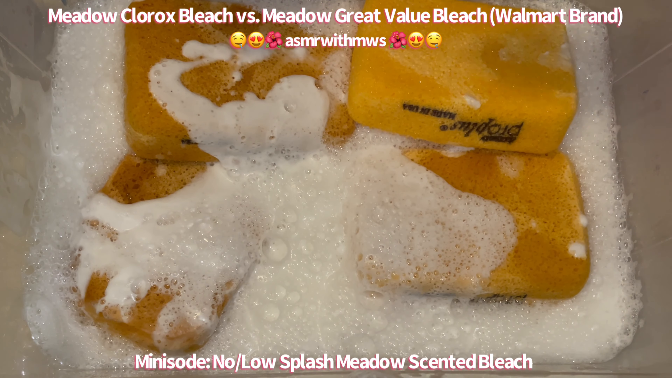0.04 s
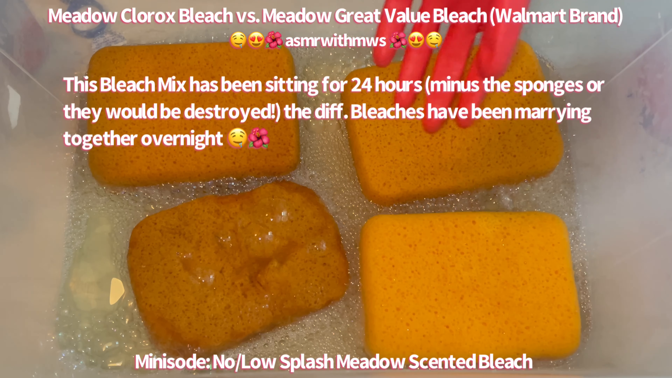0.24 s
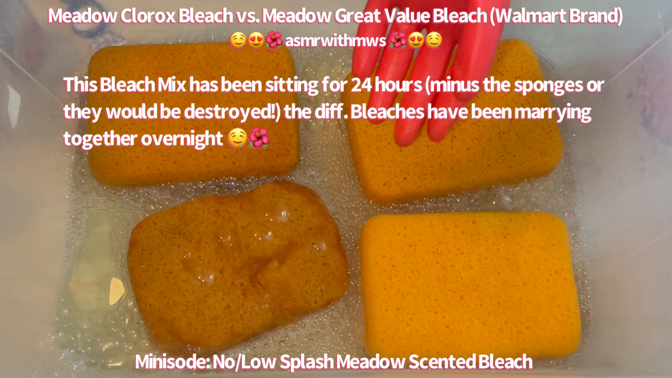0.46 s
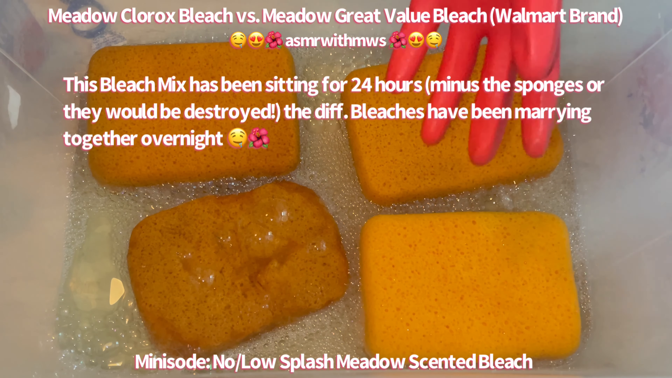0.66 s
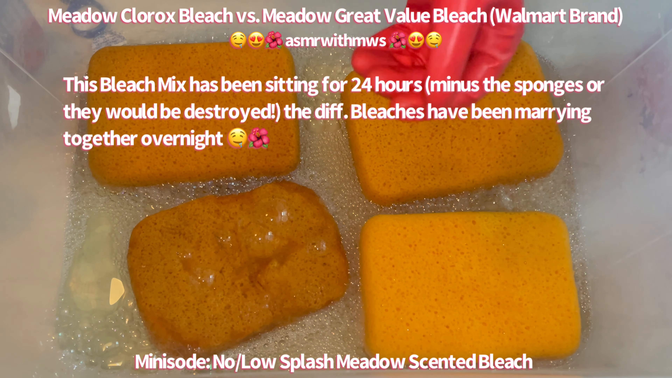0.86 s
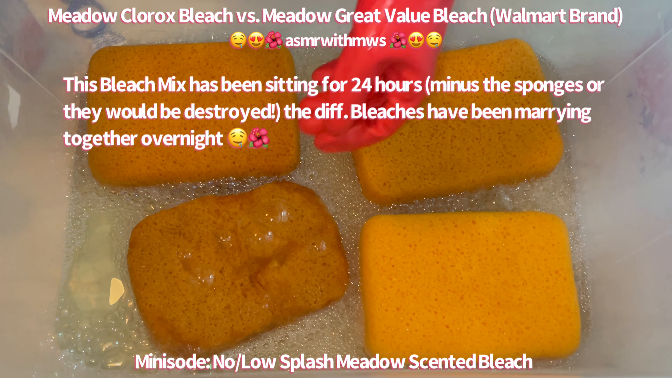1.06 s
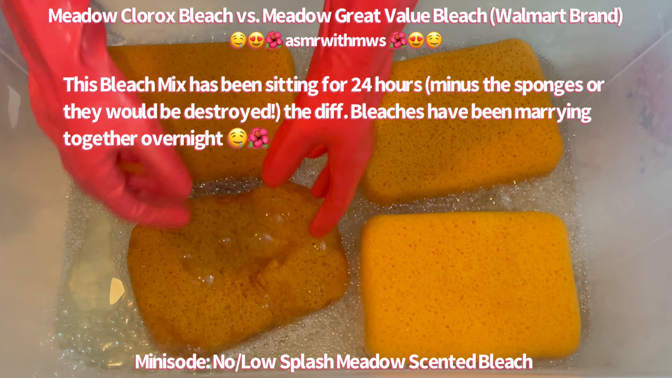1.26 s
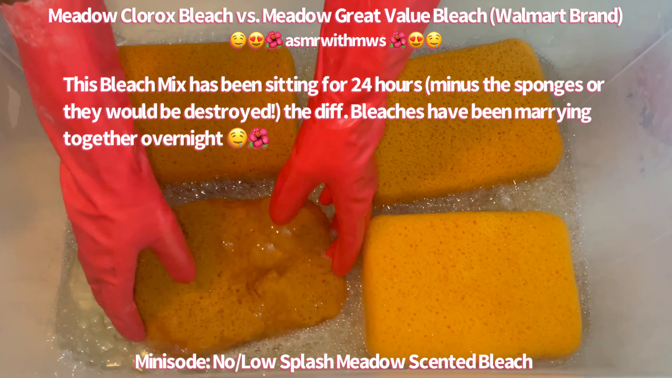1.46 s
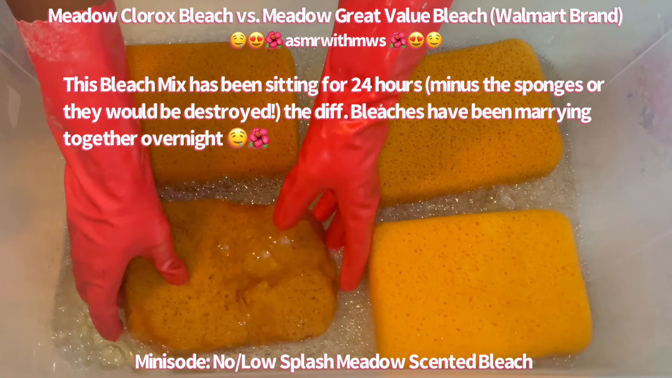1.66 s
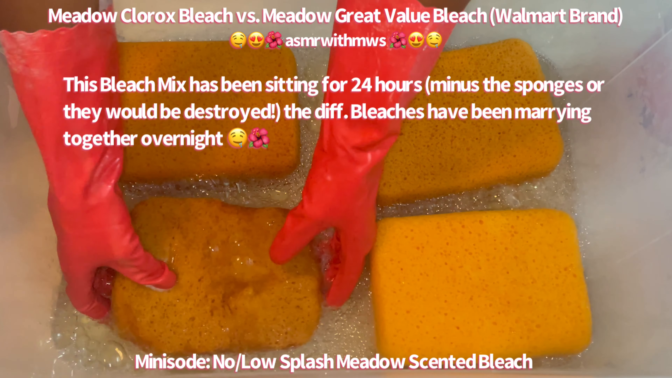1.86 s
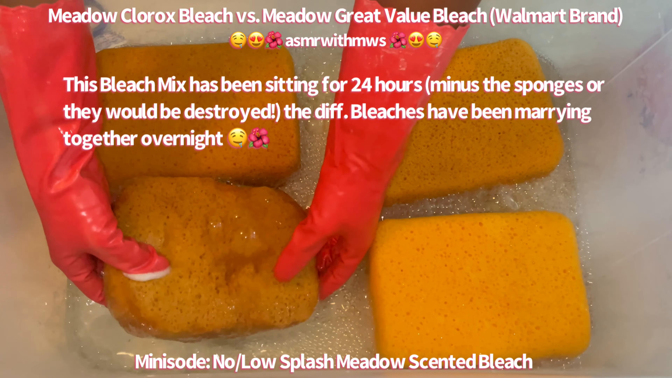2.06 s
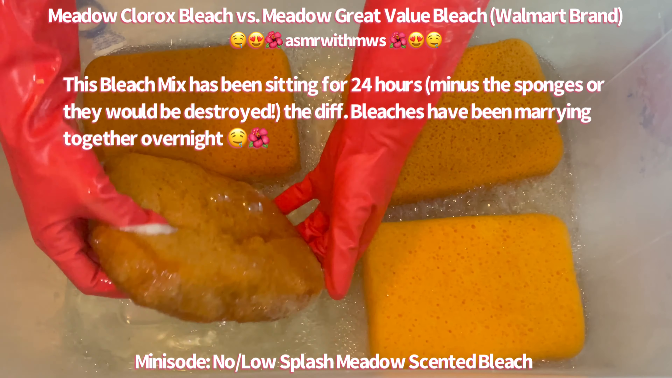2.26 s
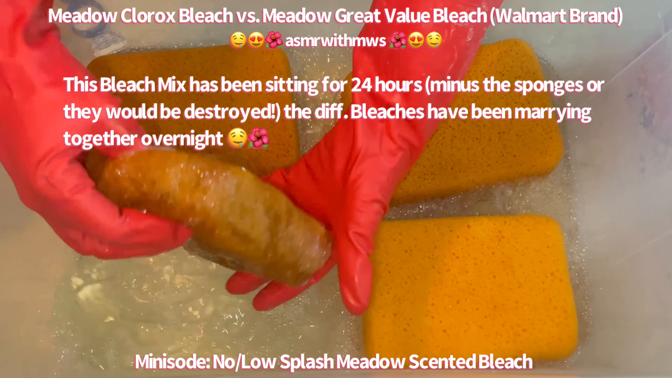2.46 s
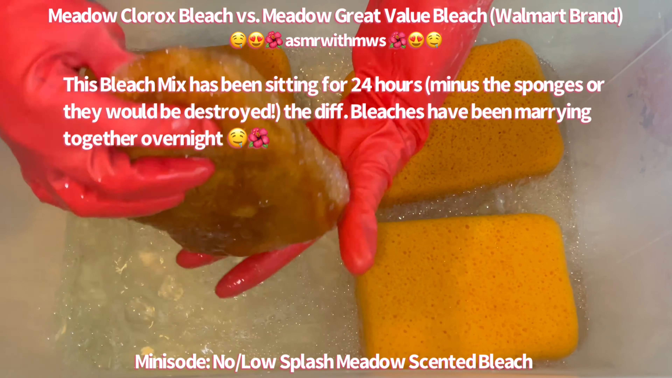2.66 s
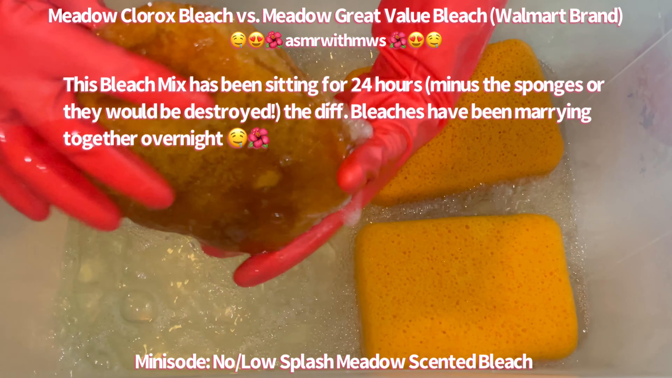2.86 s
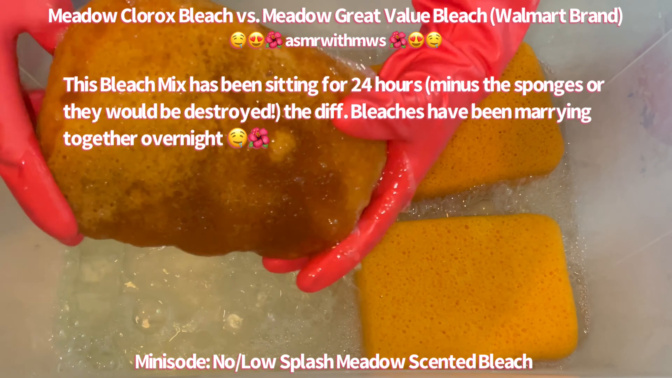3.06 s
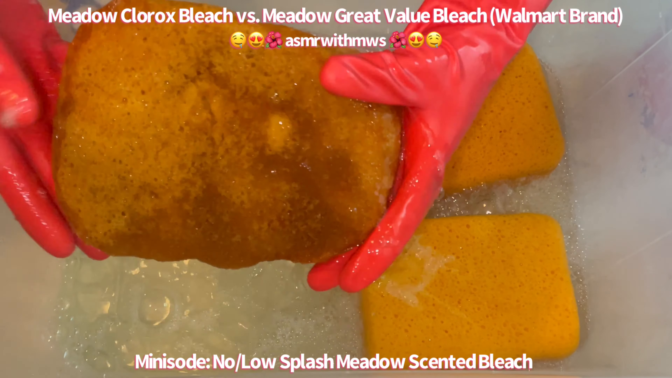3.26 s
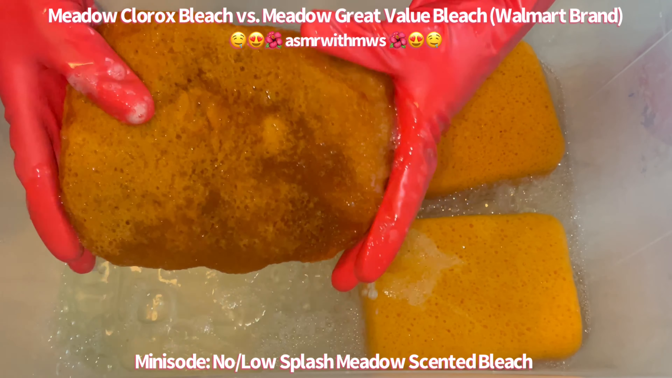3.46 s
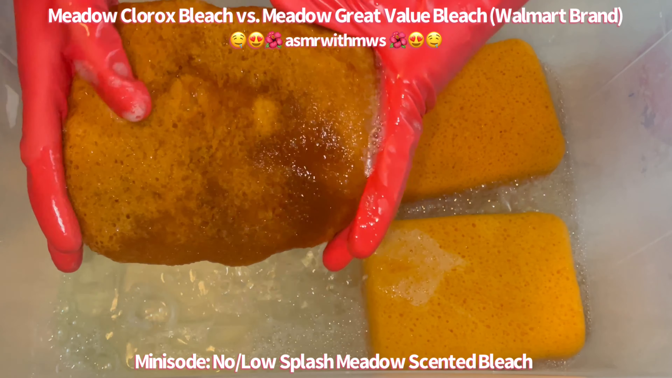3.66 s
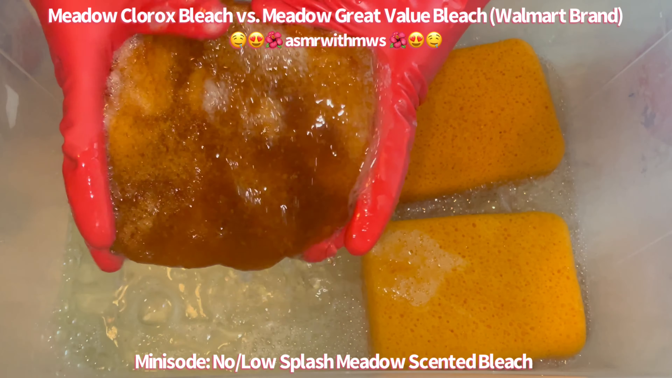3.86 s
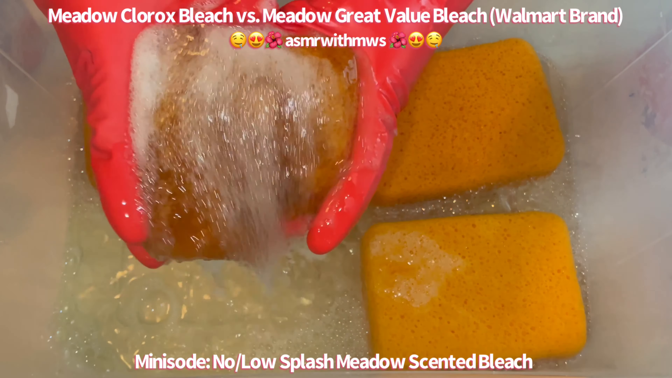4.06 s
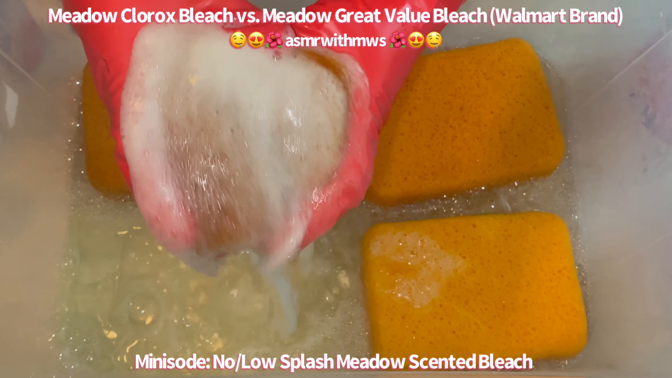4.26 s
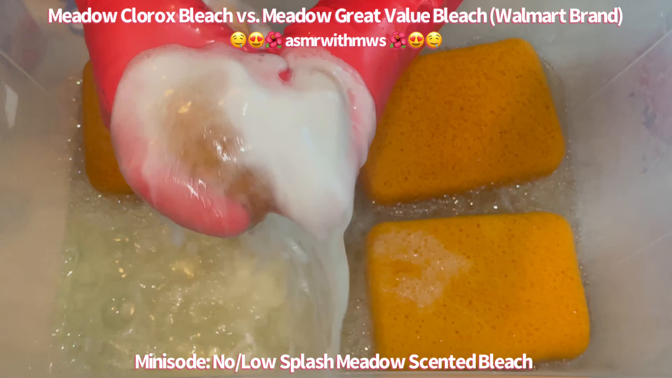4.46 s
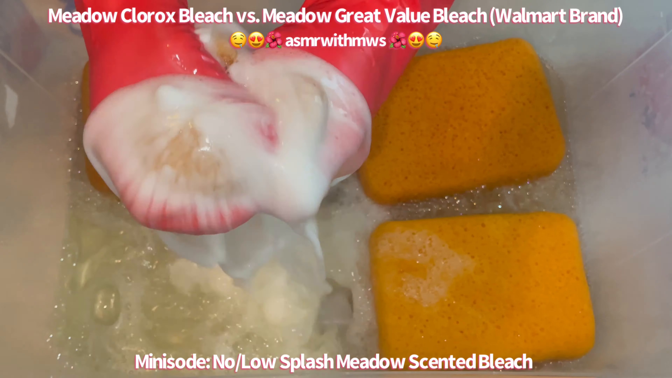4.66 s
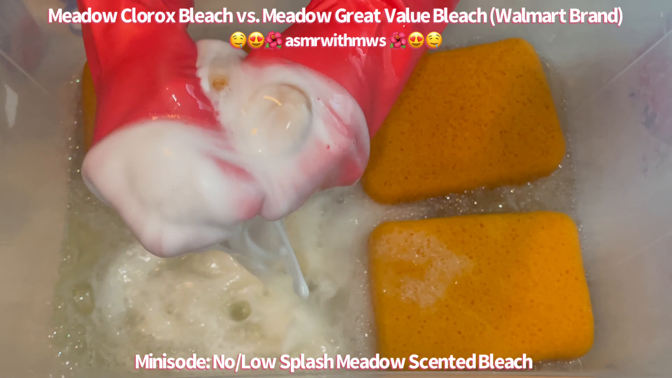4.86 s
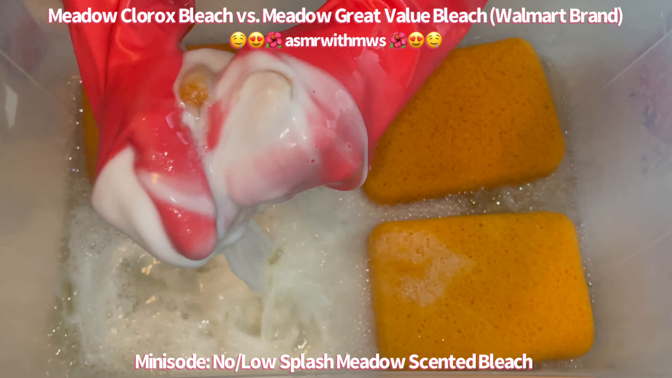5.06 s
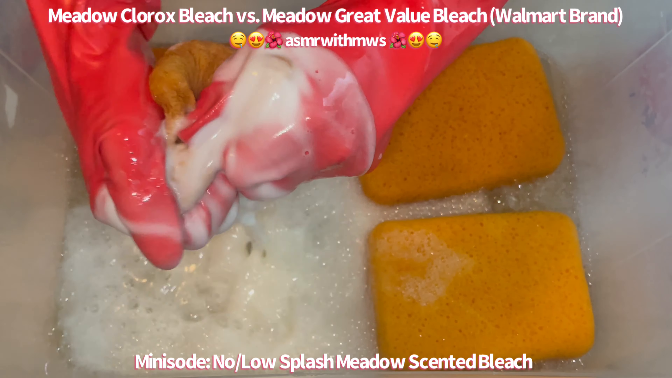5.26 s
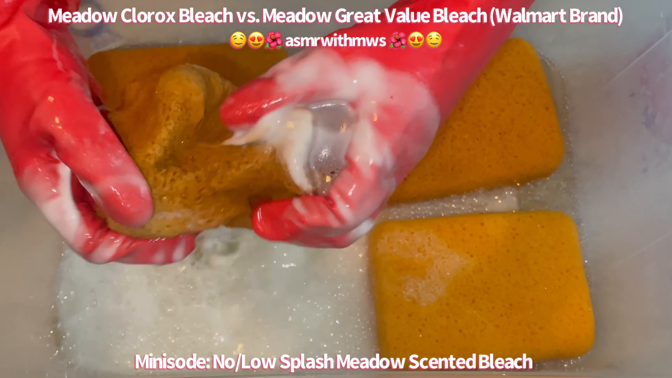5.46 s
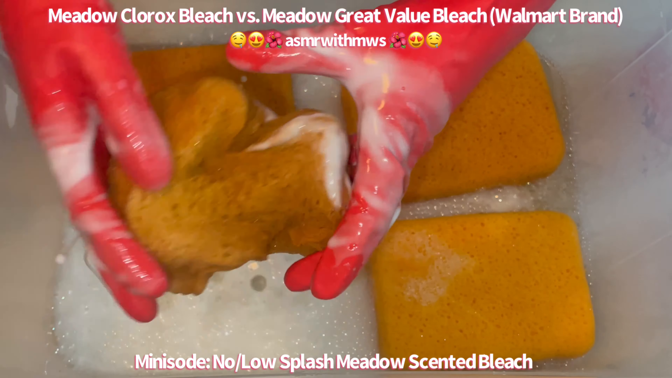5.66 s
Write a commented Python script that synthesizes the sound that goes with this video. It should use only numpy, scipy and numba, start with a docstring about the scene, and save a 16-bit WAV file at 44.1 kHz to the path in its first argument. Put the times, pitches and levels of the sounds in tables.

```python
"""Wringing a soapy sponge

Rubber-gloved hands lift a soaked sponge out of a plastic tub of soapy liquid and wring it, heard from close by.
Gloves hiss as sliding-friction noise; drops fall back as damped bubble rings with splash noise, blobs as low glugs.
Then foam hisses and squelches out and a stream gurgles, as dense crowds of small resonators driven by the squeeze.
Decaying noise gives the reflections of tub and room; shaped noise and a soft tone make the room hum."""
import sys
import numpy as np
from scipy import signal
from scipy.fft import rfft, irfft
from scipy.io import wavfile
from numba import njit

SR = 44100
rng = np.random.default_rng(int(sys.argv[2]) if len(sys.argv) > 2 else 0)


def waveform_to_disk(signal):
    """Save audio, clipped to [-1, 1], as 16-bit WAV at the path in sys.argv[1]."""
    frames = np.transpose(np.atleast_2d(signal))
    scaled = np.clip(frames, -1, 1) * 32767
    samples = np.round(scaled).astype(np.int16)
    wavfile.write(sys.argv[1], SR, samples)


N = 251811
TIME = np.arange(N) / SR
FREQS = np.maximum(np.arange(N // 2 + 1) * SR / N, 1)

# spectrum of tiny foam bubbles: pitch_hz, level_db (relative)
FIZZ_SPECTRUM = [(3000, -24), (4800, -3), (6800, -3.5), (11200, 3.5), (12500, -0.5), (14000, 0)]
LIFT_S = 2.3   # the sponge is held up from here on


def sponge():
    """Forced flow through pores: air and soap burst more bubbles, and louder, as the squeeze grows, in spurts."""
    # pitch of the squelch, falls until 4.6 s, rises until 5.0 s, then falls again: time_s, pitch_ratio
    pitch_curve = [(2.3, 1.56), (4.1, 0.98), (4.35, 0.93), (4.6, 0.77), (5.0, 0.94), (5.7, 0.83)]
    # spectrum of squelching bubbles: pitch_hz, level_db (relative)
    squelch_spectrum = [(950, -13), (1400, -8.5), (1750, -6.5), (2300, 1), (3000, 2.5), (4500, -8)]
    air = effort(sag_db_per_s=20)   # the fizz fades under a held squeeze as the air runs out
    soap = effort(sag_db_per_s=2.5)
    spurts = drift(60)

    fizz = bubbles(FIZZ_SPECTRUM, 2500 + 5000 * air, cycles=61, size_db=4.5)
    fizz = low_pass(fizz, 12560, order=14)
    fizz_gain = air * from_db(-33.5 + 2.0 * spurts)

    pitch = np.interp(TIME, *np.transpose(pitch_curve))
    squelch = bubbles(squelch_spectrum, 450 + 1100 * soap, cycles=24, size_db=2.5, pitch=pitch, rise=0.13)
    squelch = low_pass(squelch, 8300, order=2)
    squelch_gain = soap * from_db(-42 + 1.16 * spurts + 1.6 * drift(40))
    return fizz * fizz_gain + squelch * squelch_gain


def effort(sag_db_per_s=0):
    """Force as an amplitude envelope: squeezes tighten, hold (sagging) and relax; their powers add to a light grip."""
    # squeezes of the hands: full_force_s, effort_db, hold_s
    squeezes = [(3.103, -16.5, 0.051), (4.175, 0, 0.4), (5.394, -16.5, 0.11)]
    grip_db, tighten_db_per_s, relax_db_per_s = -27.5, 48, 37.5
    power = (from_db(grip_db) * sets_in(LIFT_S, rise_s=0.02)) ** 2
    for s, db, hold in squeezes:
        t = TIME - s
        fade_db = tighten_db_per_s * np.maximum(-t, 0)
        fade_db += sag_db_per_s * np.clip(t, 0, hold)
        fade_db += relax_db_per_s * np.maximum(t - hold, 0)
        power = power + from_db(db - fade_db) ** 2
    return np.sqrt(power)


def stream():
    """Bubble entrainment by a falling jet: the flow lands after a delay and gurgles with large, low bubbles."""
    # spectrum of entrained bubbles: pitch_hz, level_db (relative)
    gurgle_spectrum = [(70, 3.5), (130, 1), (230, 4), (320, -0.5), (430, 0), (560, -4), (740, -4),
                       (1300, -11)]
    fall_s, run_off_s = 0.13, 3.95   # delay of the flow; when the drips join into a stream
    follows = 0.55   # share of the effort's swing in dB that the flow takes
    landed = np.interp(TIME - fall_s, TIME, effort())
    flow = landed ** follows * sets_in(run_off_s, rise_s=0.0082)
    gurgle = bubbles(gurgle_spectrum, 650, cycles=10.7, size_db=1.2, rise=0.12)
    return flow * from_db(-44 + 2.0 * drift(25)) * gurgle


def drips():
    """Drop impact: a slap of splash noise, fine spray, a trapped bubble that rings on and a few droplets."""
    # the clearest drops: start_s, level_db, pitch_hz, splash_db, ring_db (lingering ring relative to the snap)
    drops = [(1.9287, -35.5, 3700, -51, -9), (2.38, -29.5, 6600, -39, -20), (2.485, -39, 2700, -35, -16),
             (2.531, -39, 2860, -34.5, -10), (2.8103, -25, 4970, -26.5, -8), (2.8502, -37, 5760, -41, -6),
             (2.8707, -33, 2300, -32.5, -6), (2.8994, -27, 2050, -26.5, -9),
             (2.9275, -38.5, 1057, -33, -11), (3.0077, -20.5, 7200, -33, -11),
             (3.0457, -24.5, 3200, -36, 1), (3.0658, -12, 1960, -24.5, -24),
             (3.0787, -33, 2350, -29.5, -12), (3.1212, -38, 2600, -27, -14), (3.21, -28, 6240, -31, -17),
             (3.344, -37.5, 2830, -54, 5), (3.372, -34, 2820, -45, 2), (3.401, -26, 1800, -30, -16),
             (3.594, -29.5, 3950, -39, -12), (3.6419, -36.5, 2880, -38, -6), (3.678, -34, 4400, -32, -8),
             (3.6979, -36.5, 1430, -32.5, -18), (3.7258, -25, 4360, -29.5, -12),
             (3.7556, -28, 4820, -35, -7), (3.7822, -19.5, 1950, -21.5, -14.5),
             (3.8416, -29, 2420, -27, -24), (3.8832, -25.5, 3230, -28, -11), (3.933, -27.5, 2720, -32, -8),
             (4.0157, -15.5, 6700, -25, -22), (4.0376, -22.5, 4220, -21.5, -9),
             (4.086, -26.5, 1920, -26, -12), (4.1005, -25.5, 3000, -24, -9),
             (4.1386, -16.5, 4650, -16.5, -12), (4.1495, -26, 2900, -37, -7), (4.1705, -26, 2500, -33, -7),
             (4.1782, -20, 2160, -30, -17), (4.203, -26, 3250, -35, -6), (4.2734, -24, 2430, -25, -17),
             (4.2784, -20.5, 2440, -27, -12), (4.2925, -25, 2420, -36, -8), (4.328, -20.5, 2490, -22, -8),
             (4.3444, -25, 3050, -18.5, -9), (4.382, -22, 7000, -24, -5), (4.4154, -30, 2860, -32, -12),
             (4.434, -36, 2150, -24, -16), (4.5014, -28, 2260, -27.5, -12), (4.51, -25, 2030, -34, -12),
             (4.5276, -24, 2080, -35, -10), (4.5764, -26, 1950, -38, -10), (4.6208, -25.5, 1700, -39, -17),
             (4.634, -16.5, 2450, -21, -16.5), (4.691, -28.5, 1440, -42, -12),
             (4.7048, -20, 1760, -38, -26), (4.7208, -29, 2120, -38, -11), (4.7596, -31, 2660, -39, -15),
             (4.787, -16, 2440, -22, -24), (4.813, -28, 2900, -26, -14), (4.8312, -26, 2770, -29, -22),
             (4.8433, -30.5, 1400, -33, -21), (4.8923, -21.5, 1750, -26, -32),
             (4.912, -21.5, 6300, -41, -22), (4.9589, -32.5, 2540, -29, -9), (4.967, -34, 1130, -30.5, -22),
             (5.0308, -34, 2340, -27, -16), (5.0623, -31.5, 2010, -26.5, -16),
             (5.3093, -30, 2550, -36, -16), (5.4216, -25, 1286, -29.5, -18),
             (5.4225, -31.5, 3700, -40, -10), (5.5147, -32, 920, -28.5, -23), (5.5803, -25, 6590, -30, -16),
             (5.6992, -37, 2570, -37.5, -14)]
    contact_s = 0.001109   # contact comes this long after start_s
    splash_edge_hz = 2200   # a splash starts between this and its bubble's pitch: small drops sound thinner
    out = np.zeros(N)
    for s, db, hz, splash_db, ring_db in drops + dribble():
        hit = s + contact_s
        bubble = blip(hz, cycles=4.3, sag=0.25, ring_db=ring_db)
        add(out, hit, from_db(db - 2.5) * bubble)

        splash = burst(np.sqrt(hz * splash_edge_hz), 13800, t60=0.018)
        add(out, hit, from_db(splash_db) * low_pass(splash, 12500, order=8))

        spray_hz = 11440 * rng.uniform(0.92, 1.08)
        add(out, hit, from_db(splash_db - 8.5) * blip(spray_hz, cycles=160))

        # two droplets land within 25 ms, up to half an octave higher or lower
        for late, small in rng.random((2, 2)):
            droplet = blip(hz * 2 ** (small - .5), cycles=19)
            add(out, hit + late * 0.025, from_db(db - 19.5) * droplet)
    return out


def dribble():
    """Random arrivals (Poisson): small drops, louder under a harder squeeze, in rows as for the clear drops."""
    drops_per_s, follows = 14, 0.35   # follows: share of the effort's dB
    at = np.flatnonzero((rng.random(N) < drops_per_s / SR) & (TIME > LIFT_S))
    size, octave = np.clip(rng.standard_normal((len(at), 2)), -2, 2).T
    effort_db = 20 * np.log10(effort()[at])
    db = -32.5 + follows * effort_db + 1.5 * size
    hz = 3210 * 2 ** (0.43 * octave)
    ring_db = rng.uniform(-15, -8, len(at))
    return list(zip(TIME[at], db, hz, db + 2, ring_db))


def thumps():
    """Low-frequency resonance: each thump gives a glug that sags in pitch, a slosh and a brief spatter."""
    # low thumps, a nudge of the tub at 1.1 s, then blobs thumping the liquid and the tub:
    # start_s, level_db, pitch_hz, cycles (swings until 60 dB down)
    low_knocks = [(1.103, -44, 139, 13), (3.0708, -24, 268, 6.5), (3.083, -31, 186, 11),
                  (3.098, -32, 122, 8.9), (4.29, -33, 430, 20), (4.509, -30.5, 270, 7.6),
                  (4.54, -34, 440, 26), (4.773, -36, 192, 5.9), (4.8171, -26, 308, 13),
                  (4.8966, -29.5, 260, 9.2), (4.977, -37, 123, 8), (5.032, -33.5, 305, 18),
                  (5.25, -34.5, 230, 8.5), (5.284, -29, 294, 6), (5.33, -34, 290, 7),
                  (5.3491, -31.5, 340, 7.2), (5.4244, -26, 323, 12), (5.454, -39, 176, 6.5)]
    slosh_cycles = 21
    out = np.zeros(N)
    for s, db, hz, cycles in low_knocks:
        add(out, s, from_db(db - 2.0) * blip(hz, cycles, sag=0.13))
        add(out, s, from_db(db - 8.5) * burst(hz / 3, 1.72 * hz, t60=slosh_cycles / hz))
        add(out, s, from_db(db - 13.5) * burst(440, 1950, t60=0.11))
    return out


def pops():
    """Film rupture: large soap bubbles burst with a short noise tick and a very high damped ring."""
    # bursting bubbles: start_s, level_db
    films = [(0.2478, -50), (2.592, -33), (2.745, -37), (2.9646, -29), (3.041, -22), (3.361, -32),
             (3.8003, -29.5), (3.9638, -28.5), (4.037, -16.5), (4.0716, -18.5), (4.1649, -26.5)]
    out = np.zeros(N)
    for s, db in films:
        hz = 11600 * rng.uniform(0.905, 1.066)
        add(out, s + 0.00077, from_db(db + 4.5) * blip(hz, cycles=66))
        add(out, s + 0.00092, from_db(db - 7.0) * burst(5100, 12400, t60=0.0088))
    return out


def glove():
    """Sliding friction: rubber on wet pores hisses with slight random unevenness; grips squish out tiny bubbles."""
    # glove brushing over the sponge: time_s, level_db (relative)
    rub = [(0.245, -66.5), (0.36, -67.5), (0.47, -60.5), (0.55, -58.5), (0.6, -66.5), (0.72, -79),
           (0.9, -76.5), (1.1, -115), (1.35, -78), (2.5, -79.5)]
    # spectrum of the friction noise: frequency_hz, level_db (per Hz, relative)
    rub_spectrum = [(200, -25), (600, 10.5), (1200, 7), (2600, 5), (4500, 1), (7000, 6.5), (11000, 4.5),
                    (12300, 0.5), (13500, -32)]
    # fingers squishing the sponge: middle_s, level_db, length_s (time from the middle to 1/e)
    grips = [(1.308, -54.5, 0.019), (1.446, -54, 0.017), (1.645, -54.5, 0.017), (1.91, -55, 0.076),
             (2.112, -56, 0.048), (2.256, -51.5, 0.0088), (2.293, -52.5, 0.009), (2.502, -47, 0.0075),
             (2.906, -46, 0.037), (3.169, -42, 0.062), (5.277, -46, 0.028)]
    s, rub_db = np.transpose(rub)
    level = from_db(np.interp(TIME, s, rub_db, left=-120, right=-120))
    unevenness = from_db(13.0 + 1.5 * drift(70.1))
    slide = level * unevenness * noise(from_db(at_hz(rub_spectrum, FREQS)))

    grip = sum(from_db(db) * swell(middle, length) for middle, db, length in grips)
    gurgle = bubbles([(1500, -8.0), (2600, 30), (4200, -25.0)], 620, cycles=42, size_db=-6.5)
    fizz = low_pass(bubbles(FIZZ_SPECTRUM, 5400, cycles=16, size_db=6.0), 11700, order=10)
    return slide + grip * from_db(-13.5) * gurgle + grip * fizz


def crease():
    """Crackle noise: the gloves rustle dully, in many tiny damped rings, as the fingers close on the sponge."""
    spectrum = [(450, -3), (1400, -6), (2400, 1), (3400, -8)]
    rustle = bubbles(spectrum, 3000, cycles=7.2, size_db=2.5)
    return swell(1.636, 0.11) * from_db(-61.5 + 2 * drift(45)) * rustle


def nudge():
    """Wall vibration: the tub gives a short, dull rumble as a hand shifts a sponge against it."""
    spectrum = [(50, -25), (100, 4), (220, -24), (420, -8.5), (1500, -39), (6000, -70)]
    return from_db(-47) * swell(1.082, 0.051) * noise(from_db(at_hz(spectrum, FREQS)))


def echoes(x, delay, t60, dull_hz):
    """Diffuse reverberation: dense reflections, different at each port, that die away with dulled treble."""
    t = TIME[:SR // 2]
    onset = np.clip(t / delay - 1, 0, 1)
    tail = rng.standard_normal((2, len(t))) * from_db(-60 * t / t60) * onset
    tail /= np.sqrt(np.sum(tail ** 2, axis=1, keepdims=True))
    return signal.fftconvolve(x[None], low_pass(tail, dull_hz, order=1), axes=1)[:, :N]


def room_tone():
    """Broadband and resonant noise: low ventilation rumble, wavering hum lines, a faint hiss and a steady tone."""
    # spectrum of the rumble: frequency_hz, level_db (per Hz, relative)
    rumble_spectrum = [(20, -37), (40, -16.5), (70, -5), (110, -3.5), (190, -11), (300, -11), (560, -18),
                       (900, -22.5), (1500, -30), (2600, -31), (4500, -39.5), (11500, -47.5), (14000, -72)]
    # hum lines: frequency_hz, width_hz, level_db (before the common lift)
    hum_lines = [(85.2, 5.9, -63), (106.8, 6.3, -63.5), (153.2, 14, -60), (315.6, 12, -67),
                 (569.5, 7.8, -68.5)]
    # spectrum of the hiss: frequency_hz, level_db (per Hz, relative)
    hiss_spectrum = [(800, -24), (1600, 2), (2200, 7), (2650, 11.5), (3300, 3), (4200, 4), (5000, -1.5),
                     (5800, 4.5), (7000, -1.5), (11500, -67), (13000, -46)]
    hiss_start_s, tone_hz, hum_lift_db = 0.232, 150.4, 1.5
    rumble = from_db(-48) * noise(from_db(at_hz(rumble_spectrum, FREQS)))

    # narrow noise bands; their powers add
    lines = sum(from_db(db) ** 2 / width / (1 + ((FREQS - hz) / width * 2) ** 2) ** 2
                for hz, width, db in hum_lines)
    hum_gain = np.sqrt(sum(from_db(db) ** 2 for hz, width, db in hum_lines))
    hum = from_db(hum_lift_db) * hum_gain * noise(np.sqrt(lines))

    # hiss and tone set in suddenly together and stay
    hiss = noise(from_db(at_hz(hiss_spectrum, FREQS)))
    hiss = from_db(-62) * sets_in(hiss_start_s, rise_s=0.017) * hiss
    tone = np.sin(2 * np.pi * tone_hz * TIME + 0.11 * drift(3.0))
    tone = from_db(-51.5) * sets_in(hiss_start_s, rise_s=0.015) * tone
    return rumble + hum + tone + hiss


def bubbles(spectrum, per_s, cycles, size_db, pitch=1, rise=0):
    """Superposed damped oscillators of random size and pitch, rising by a share; pitch slides the spectrum; rms 1."""
    rate, slide = per_s * np.ones(N), pitch * np.ones(N)
    chance, place, size, sign = rng.random((4, N))
    at = np.flatnonzero(chance < rate / SR)
    low_hz, high_hz = spectrum[0][0], spectrum[-1][0]
    hz = low_hz * (high_hz / low_hz) ** place[at]
    db = size_db * np.minimum(-np.log(1 - size[at]), 3.5) + at_hz(spectrum, hz / slide[at])
    # dividing by the root of the rate keeps denser crowds equally strong
    height = from_db(db) * hz * np.sign(sign[at] - .5) / np.sqrt(rate[at])
    turn, length = 2 * np.pi * hz / SR, cycles * SR / hz
    fade, glide = np.log(1000) / length, rise * turn / length
    return rms_one(ring_each(at, height, turn, fade, glide, length.astype(np.int64), N))


@njit
def ring_each(at, size, turn, fade, glide, length, total):
    """Complex rotation: sums damped swings, each with its own start, size, pitch, decay and glide."""
    out = np.zeros(total)
    for k in range(len(at)):
        swing, step, bend = size[k] + 0j, np.exp(1j * turn[k] - fade[k]), np.exp(1j * glide[k])
        out[at[k]] += size[k] / 2
        for i in range(at[k] + 1, min(at[k] + length[k], total)):
            swing *= step
            step *= bend
            out[i] += swing.real
    return out


def blip(hz, cycles, sag=0, ring_db=-120):
    """Damped bubble resonance: swells within a cycle, sags in pitch by a share, dies; a ring may linger; peak 1."""
    settle_cycles, ring_cycles = 2.6, 51
    age = hz * TIME[:8192]   # in cycles
    turns = age + sag * (settle_cycles * (1 - np.exp(-age / settle_cycles)) - age / 2)
    fade = from_db(-60 * age / cycles) + from_db(ring_db - 60 * age / ring_cycles)
    wave = np.sin(2 * np.pi * turns) * fade * (1 - np.exp(-np.pi * age))
    # a small source radiates little below its pitch
    wave = signal.sosfilt(signal.butter(2, hz / 2, "high", fs=SR, output="sos"), wave + 1e-18)
    return wave / np.abs(wave).max()


def burst(low_hz, high_hz, t60):
    """Exponential decay of band-limited splash noise, peak 1."""
    t = TIME[:8192]
    splash = rng.standard_normal(len(t)) * from_db(np.maximum(-60 * t / t60, -200))
    splash = signal.sosfilt(signal.butter(2, [low_hz, high_hz], "band", fs=SR, output="sos"), splash)
    return splash / np.abs(splash).max()


def noise(shape):
    """Spectral shaping: stereo noise with the given gain per frequency, rms 1."""
    return rms_one(irfft(rfft(rng.standard_normal((2, N))) * shape, N))


def drift(rate):
    """Slow random modulation: joined random points, rate of them a second, rms 1."""
    knots = rng.standard_normal(4000)
    return rms_one(np.interp(TIME * rate, np.arange(len(knots)), knots))


def swell(middle_s, length_s):
    """Gaussian envelope, peak 1."""
    return np.exp(-((TIME - middle_s) / length_s) ** 2)


def sets_in(s, rise_s):
    """Linear onset: a gain that goes from 0 to 1 just after time s."""
    return np.clip((TIME - s) / rise_s, 0, 1)


def low_pass(x, hz, order):
    """Butterworth low-pass."""
    return signal.sosfilt(signal.butter(order, hz, fs=SR, output="sos"), x)


def at_hz(points, hz):
    """Interpolation of a spectrum on a log-frequency axis."""
    f, value = np.transpose(points)
    return np.interp(np.log(hz), np.log(f), value)


def from_db(db):
    """Decibels to amplitude gain."""
    return 10 ** (np.asarray(db) / 20)


def rms_one(x):
    """Normalisation to rms 1."""
    return x / np.sqrt(np.mean(x ** 2) + 1e-20)


def add(out, s, sound):
    """Superposition: mix a short sound in at time s."""
    at = max(int(s * SR), 0)
    out[at:at + len(sound)] += sound[:max(N - at, 0)]


def scene():
    """Direct and reflected sound: the wet sounds also return from the tub walls and from the room."""
    wet = sponge() + stream() + drips() + pops() + thumps()
    # the thin walls let the bass through
    reflected = signal.sosfilt(signal.butter(2, 700, "high", fs=SR, output="sos"), wet)
    tub = from_db(-4.5) * echoes(reflected, delay=0.0012, t60=0.014, dull_hz=10200)
    room = from_db(-7.0) * echoes(wet, delay=0.0043, t60=0.31, dull_hz=6300)
    return wet + tub + room + glove() + crease() + nudge() + room_tone()


def record(dry):
    """Two-port reception: close ports differ in phase, spread and level by frequency; the top falls off steeply."""
    # phase between the microphone ports: frequency_hz, left_lead_rad
    port_phase = [(20, 0), (350, -.15), (700, -1.1), (1200, -.1), (2000, .1), (2700, .6), (3900, .7),
                  (4500, 1.5), (4800, 3.1), (5300, 4.9), (5800, 6.2), (6300, 6.4), (7900, 8.2), (8700, 9.3),
                  (9500, 9.5), (11300, 11.4), (12200, 12.5)]
    # gain of the difference between the ports: frequency_hz, level_db
    port_spread = [(60, -35), (200, -18), (450, -7.5), (1000, 2), (1800, -9.5), (3000, 1.5), (4500, 0.5),
                   (6000, -5), (7500, -17), (9000, -19.5), (11000, 7.5), (13000, -9)]
    # level difference between the ports: frequency_hz, left_excess_db
    port_balance = [(50, -1), (140, 0.75), (500, 1), (1100, -1), (4000, -0.9), (8000, 0)]
    left, right = rfft(dry)
    mid = (left + right) / 2
    side = (left - right) / 2 * from_db(at_hz(port_spread, FREQS))
    # half of each difference goes to either port
    turn = np.exp(.5j * at_hz(port_phase, FREQS)) * from_db(at_hz(port_balance, FREQS) / 2)
    pair = irfft(np.array([(mid + side) * turn, (mid - side) / turn]), N) * from_db(0.22)
    pair = low_pass(pair, 11350, order=3)
    # 60 dB down from 16.5 kHz upward
    return signal.sosfilt(signal.cheby2(12, 60, 16500, fs=SR, output="sos"), pair)


dry = scene()
out = record(dry)
waveform_to_disk(out)
```